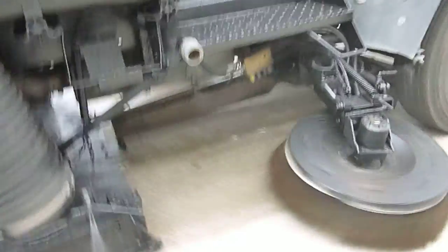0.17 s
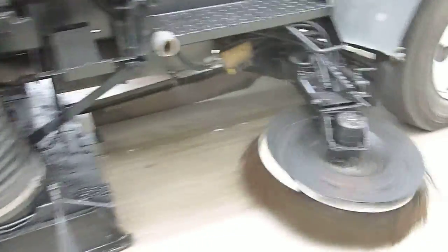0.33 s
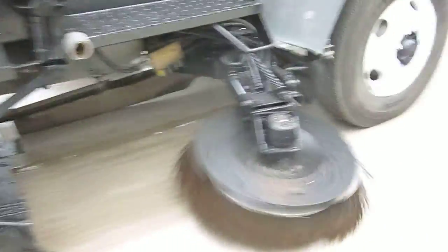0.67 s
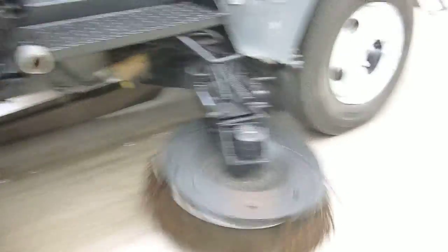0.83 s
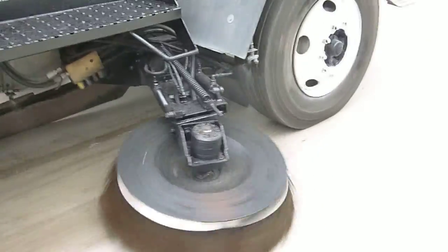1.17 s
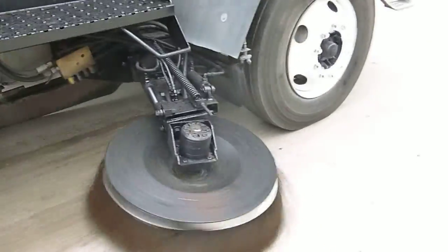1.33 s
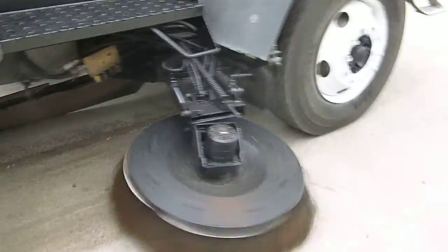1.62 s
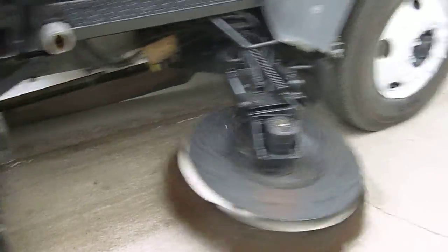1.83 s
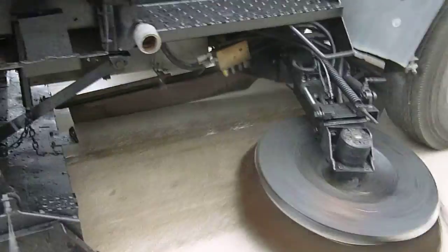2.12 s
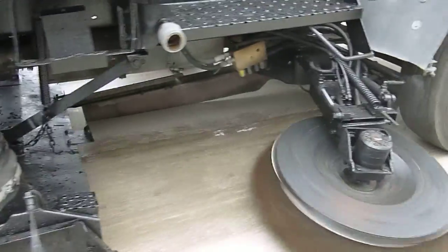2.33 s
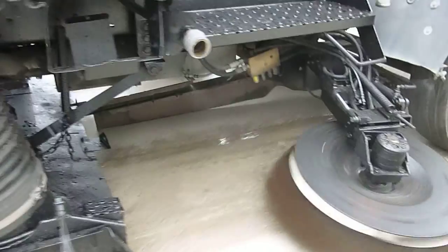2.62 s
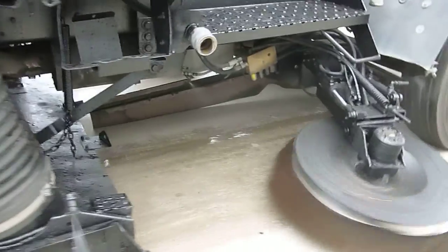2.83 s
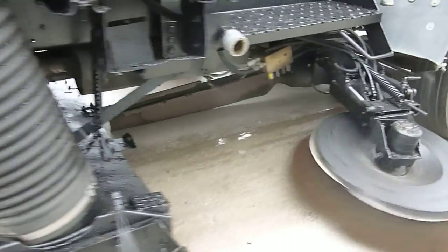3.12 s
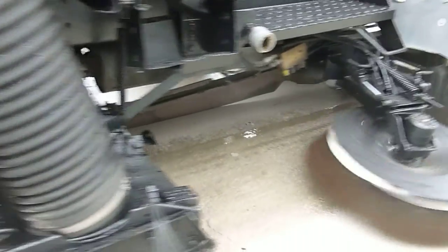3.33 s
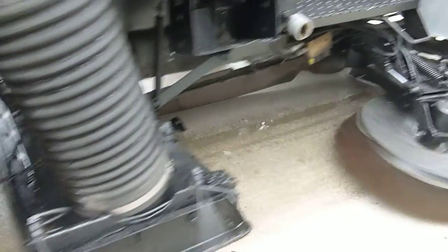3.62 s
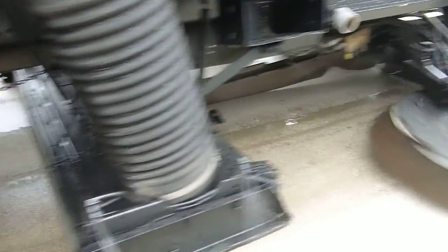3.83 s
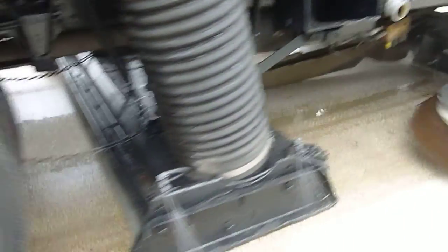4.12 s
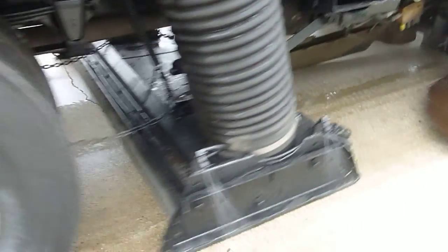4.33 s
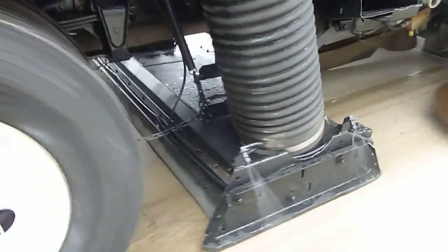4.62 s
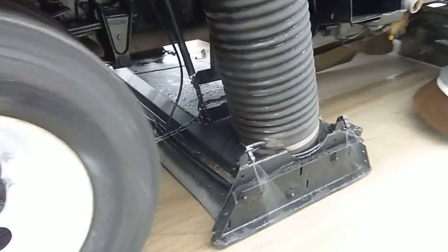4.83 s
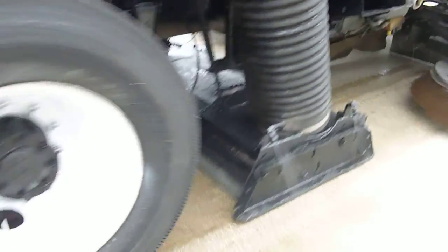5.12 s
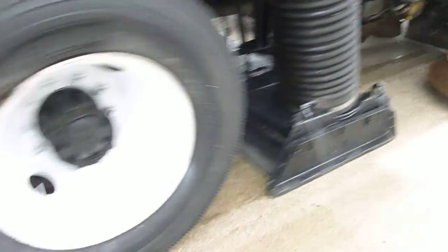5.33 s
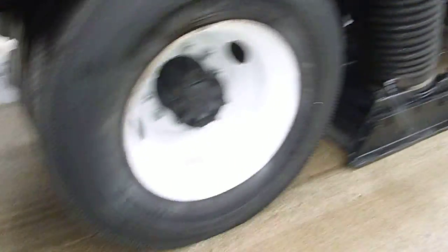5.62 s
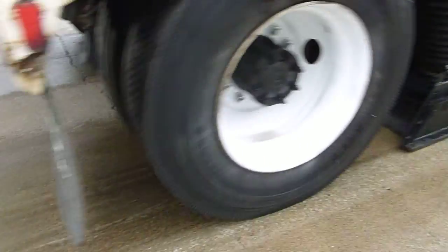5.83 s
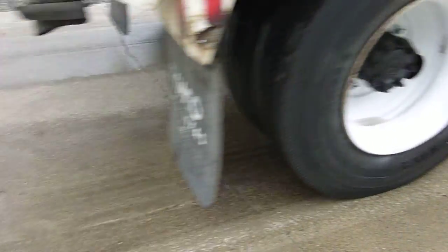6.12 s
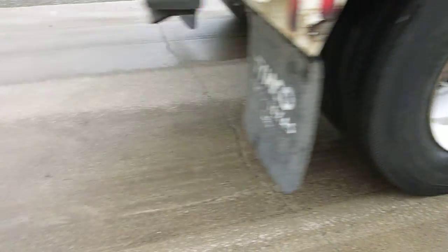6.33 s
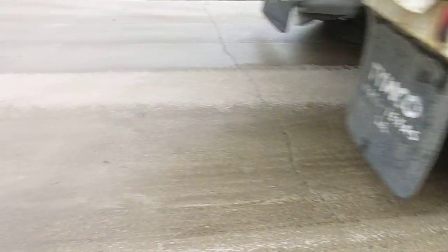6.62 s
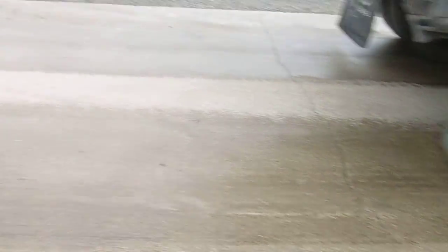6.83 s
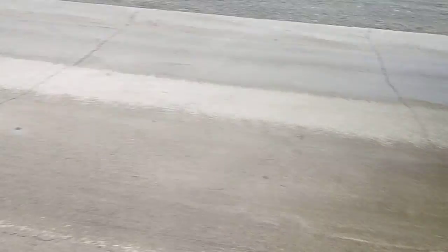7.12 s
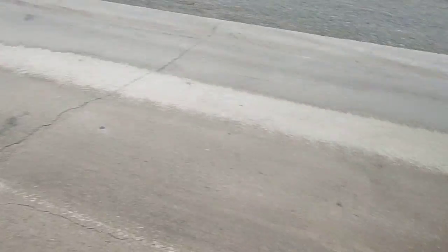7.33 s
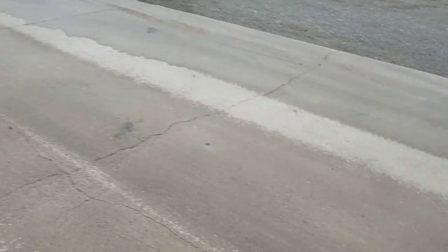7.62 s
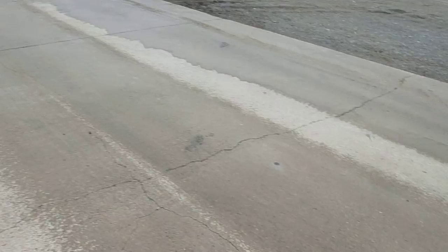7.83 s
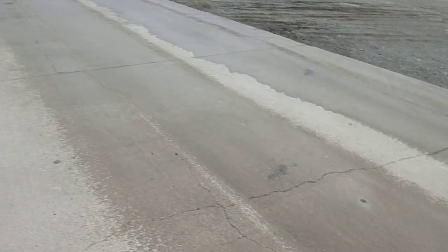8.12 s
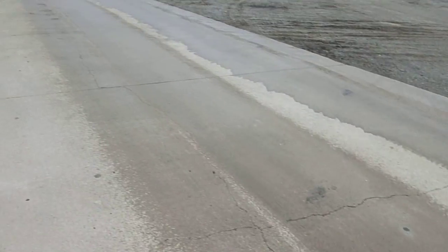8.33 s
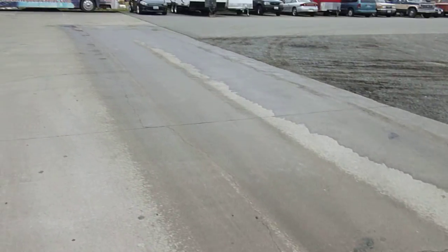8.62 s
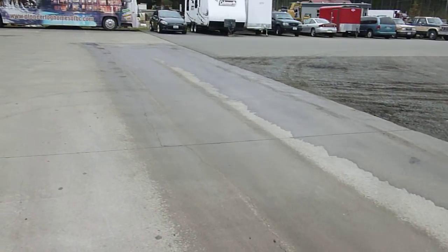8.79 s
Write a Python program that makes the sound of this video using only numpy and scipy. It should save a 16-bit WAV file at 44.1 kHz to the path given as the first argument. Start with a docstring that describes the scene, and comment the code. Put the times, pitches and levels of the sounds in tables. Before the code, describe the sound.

Steady diesel hum, wavering blower drone and broad air noise from a slowly passing sweeper truck, with a steel brush swishing on concrete.

```python
"""Street sweeper passing on a concrete yard

From a few steps away the microphone hears cab and side broom creep by, then the nozzle, then the tail.
The diesel hums and clatters; the suction fan drones on its blade tones and roars through the hopper;
the steel broom swishes once a turn and flicks grit. Each part is loudest as it draws level;
wheel and body then screen the front of the truck, and the roar from the tail takes over."""
import sys
import numpy as np
from scipy import signal
from scipy.fft import rfft, irfft
from scipy.io import wavfile
from scipy.ndimage import uniform_filter1d

SR = 44100
rng = np.random.default_rng(int(sys.argv[2]) if len(sys.argv) > 2 else 0)


def wrap_up_sound(samples):
    """Save the sound to the file named by the first command line argument, as 16-bit audio."""
    columns = np.atleast_2d(samples).T
    # keep every value between -1 and 1, then stretch to whole-number steps
    tamed = np.clip(columns, -1, 1)
    steps = np.round(tamed * 32767).astype(np.int16)
    wavfile.write(sys.argv[1], SR, steps)


N = 395136
T = np.arange(N) / SR

# Diesel hum, fan blade tone and its octave, swelling and fading at the microphone: time_s, level_db
HUM_LEVELS = [(0, -27.0), (3.4, -26.5), (6.3, -30.5), (6.6, -40), (7.15, -47.5), (7.85, -35.0),
              (8.96, -34.5)]
BLADE_LEVELS = [(0, -32), (0.45, -28.5), (2.4, -30.0), (3.4, -36.5), (4.4, -32.0), (5.1, -39.5),
                (5.85, -24), (6.1, -25.5), (7.0, -28.5), (7.2, -33.5), (7.9, -40), (8.96, -30.5)]
OCTAVE_LEVELS = [(0, -32.5), (0.75, -34.5), (1.15, -43), (1.6, -45.5), (2.4, -26.5), (3.6, -24.0),
                 (4.75, -25.5), (5.2, -40.5), (5.65, -27.0), (6.03, -50), (7.0, -25), (7.7, -35.5),
                 (8.1, -27.5), (8.96, -41)]
# Weaker engine tones: multiple_of_firing_rate, level_db
ENGINE_ORDERS = [(3 / 2, -44), (5 / 2, -46), (6 / 2, -46)]
# Noise spectra of body panels, engine block, outlet, hose, intake air and broom: frequency_hz, level_db
PANEL_SPECTRUM = [(70, -26), (110, -4), (170, -0.5), (240, 1), (300, -4.5), (420, -10.5), (800, -38.5)]
CLATTER_SPECTRUM = [(600, -19), (1100, -4), (1550, 0.5), (2000, -1.5), (2200, -3.5), (2600, -4),
                    (3200, -12), (5000, -21), (8000, -31.5)]
RUMBLE_SPECTRUM = [(20, -23.5), (35, -11.5), (55, -2), (85, 4), (110, -6), (160, -11.5), (300, -31.5)]
HOSE_SPECTRUM = [(200, -16), (400, -5), (590, 3), (660, 0), (720, -1), (830, -5.5), (1100, -16),
                 (2000, -34)]
RUSH_SPECTRUM = [(500, -12.5), (800, -4.5), (1000, -1), (1150, -1), (1350, -3), (1900, -12), (3500, -21.5),
                 (8000, -42)]
BROOM_SPECTRUM = [(1000, -17), (2200, -0.5), (3200, -0.5), (4000, -0.5), (5000, -2), (6000, -4.5),
                  (7000, -6.5), (7700, -11.5), (8300, -20), (8900, -37)]
# Resonances of engine guard, hopper, nozzle and the hollow under the tail: pitch_hz, width_hz, level_db
GUARD_MODES = [(2198, 110, -1), (1583, 170, -2)]
HOPPER_MODES = [(323.4, 33, -3.5), (359.2, 39, 0), (393.5, 35, -5)]
NOZZLE_MODES = [(454.7, 54, -3), (494.6, 57, -6.5)]
UNDERBODY_MODES = [(735, 260, 0)]
# Thin whines of the broom drive: pitch_hz, level_db
DRIVE_WHINES = [(1265, -46.5), (1324, -45.5), (2208, -55)]
# A stone flung against steel, and its bounces: start_s, level_db
STONE_BLOWS = [(5.603, -25), (5.607, -30), (5.610, -32)]
# Ring of the struck steel: pitch_hz, level_db, t60_s
STEEL_MODES = [(6035, 0, .033), (6352, -7, .025), (6848, -11, .04), (7574, -7, .03)]
# Bristles catching on the concrete: centre_s, half_width_s, level_re_hiss_db, pitch_hz
BRISTLE_CATCHES = [(.62, 0.044, -2, 4700), (1.16, 0.039, -7, 4900), (1.9, .03, -10, 3700),
                   (4.875, .02, -10, 3300), (5.262, .025, -3, 3930), (5.84, .04, -6, 3000),
                   (6.1, .09, -6.5, 3900), (7.52, .13, -5.5, 3600)]

# Parts going by the microphone: nearest_s, time_to_fall_3_db_s
CAB_PASS, BROOM_PASS, BRISTLE_TIPS_PASS = (1.3, 3.7), (2.1, 8.4), (1.2, 3.65)
HOSE_PASS, RUSH_PASS, UNDERBODY_PASS = (3.7, 5.0), (3.0, 7.5), (6.35, .33)
# Parts turning towards the microphone or away: start_s, end_s, change_db
NOZZLE_OPENS, OUTLET_OPENS, HOPPER_OPENS = (1.5, 5.4, 10), (3.5, 6.8, 8.2), (5.7, 7.5, 4.6)
BROOM_HIDES = (6.0, 6.4, -2.85)
TAIL_OPENS = (6.86, 7.6, 2.3)  # the tail clears and sound comes out from under the chassis
# Sound shadows and dips: start_s, deepest_s, end_s, depth_db
WHEEL_SHADOW, HOSE_SHADOW = (5.5, 6, 7.5, -7), (3.5, 5.5, 6.15, -1)  # rear wheel screens nozzle, hose
CORNER_SHADOW = (5, 6.9, 7, -2)  # cast by the body's corner
TREBLE_DIP = (7.62, 7.94, 8.25, -3.2)  # the treble dips briefly behind the truck

FIRING_HZ, BLADE_HZ = 120.4, 262.0  # governed rates of firings and fan blades
BROOM_TURN_HZ, BROOM_BITE_S = 5.45, .62


def undb(db):
    """Decibels to gain."""
    return 10 ** (np.asarray(db) / 20)


def unit(x):
    """Scale to rms 1."""
    return x / np.sqrt(np.mean(x ** 2))


def noise():
    """White noise."""
    return rng.standard_normal(N)


def drift(rate_hz):
    """Smooth random motion of rms 1 that changes about rate_hz times a second."""
    size = max(int(SR / rate_hz), 1)
    steps = np.repeat(rng.standard_normal(N // size + 1), size)
    return unit(uniform_filter1d(uniform_filter1d(steps, size), size)[:N])


def colour(x, spectrum):
    """Shape x by (frequency_hz, level_db) points; rms 1."""
    hz, db = np.transpose(spectrum)
    bins_hz = np.maximum(np.fft.rfftfreq(N, 1 / SR), 1)
    shape_db = np.interp(np.log(bins_hz), np.log(hz), db, left=-90, right=-90)
    return unit(irfft(rfft(x) * undb(shape_db), N))


def resonate(modes):
    """Noise rings each (pitch_hz, width_hz, level_db) resonance; rms 1."""
    ringing = 0
    for hz, width, db in modes:
        b, a = signal.iirpeak(hz, hz / width, SR)
        ringing += undb(db) * unit(signal.lfilter(b, a, signal.lfilter(b, a, noise())))
    return unit(ringing)


def passing(nearest_s, passing_s):
    """Level in dB of a part going by in a straight line, 0 when nearest the microphone."""
    return -20 * np.log10(np.hypot(1, (T - nearest_s) / passing_s))


def ramp(start_s, end_s, change_db):
    """Level in dB that moves evenly to a new value and stays there."""
    return change_db * np.clip((T - start_s) / (end_s - start_s), 0, 1)


def dip(start_s, deepest_s, end_s, depth_db):
    """Level in dB that sinks and comes back."""
    return ramp(start_s, deepest_s, depth_db) - ramp(deepest_s, end_s, depth_db)


def swell(levels):
    """Gain through (time_s, level_db) points: broad crests and narrow nulls, as in a standing wave."""
    time_s, db = np.transpose(levels)
    return np.interp(T, time_s, undb(db))


def ground_echo(x, echo_db=-18, lag_s=.004, sway=.12):
    """Concrete and chassis return the treble a moment later; the lag drifts as the truck moves."""
    treble = signal.sosfilt(signal.butter(2, 900, "high", fs=SR, output="sos"), x)
    delay_s = lag_s * (1 + sway * drift(1))
    return x + undb(echo_db) * np.interp(T - delay_s, T, treble)


def broom_drive(nearest_s=3.2, passing_s=0.79, wobble=.003):
    """The hydraulic drive whines faintly as it goes by."""
    whine = 0
    for hz, db in DRIVE_WHINES:
        phase = 2 * np.pi * np.cumsum(hz * (1 + wobble * drift(40))) / SR
        whine += np.sin(phase) * undb(db + 2 * drift(5.5))
    return np.sqrt(2) * whine * undb(passing(nearest_s, passing_s))


def flung_stone(crack_db=-1.5, crack_s=.0015, ring_db=-6.5):
    """A stone strikes steel and bounces; each blow gives a short crack and a bright ring."""
    t = T[:SR // 10]
    ring = sum(undb(db - 60 * t / t60) * np.sin(2 * np.pi * hz * t) for hz, db, t60 in STEEL_MODES)
    blows = np.zeros(N)
    for start_s, db in STONE_BLOWS:
        blows[int(start_s * SR)] += undb(db)
    bright_noise = colour(noise(), [(3000, -16), (5000, -10), (6000, 0), (8000, -1), (9000, -16)])
    crack = signal.fftconvolve(blows, np.exp(-t / crack_s))[:N] * bright_noise
    return undb(ring_db) * signal.fftconvolve(blows, ring)[:N] + undb(crack_db) * crack


def diesel(hum_db=-0.2, clatter_db=-35.8, guard_db=-46.5, panel_db=-30, knock=0.29,
           flutter_db=0.5, surge_db=0.7, wobble=0.00203):
    """Firings make a smooth hum; the block knocks on every second one, clearly only beside the cab."""
    phase = 2 * np.pi * np.cumsum(FIRING_HZ * (1 + wobble * drift(8))) / SR
    hum = np.sin(phase) * swell(HUM_LEVELS) * undb(hum_db + flutter_db * drift(14))
    for multiple, db in ENGINE_ORDERS:
        hum += np.sin(multiple * phase) * undb(db + 2 * drift(3.7))
    beside_cab = np.interp(T, [3.4, 4.6], [1, .2])
    beat = 1 + knock * beside_cab * np.cos(phase / 2) + .14 * np.cos(phase)
    clatter = colour(noise() * beat, CLATTER_SPECTRUM) * undb(clatter_db)
    clatter += resonate(GUARD_MODES) * beat * undb(guard_db)
    path_db = passing(*CAB_PASS) + .6 * dip(*CORNER_SHADOW) + ramp(*TAIL_OPENS) + dip(*TREBLE_DIP)
    rear_db = np.interp(T, [5, 7.5], [-.4, .8])  # the panels sound fuller from behind
    panels = colour(noise(), PANEL_SPECTRUM) * undb(panel_db + rear_db + 0.49 * drift(5))
    return np.sqrt(2) * hum + clatter * undb(path_db + surge_db * drift(12)) + panels


def side_broom(hiss_db=-35.5, tips_db=-34.0, swish_db=0.66, flicker_db=0.43, patchy_db=0.77,
               slips_per_s=600, grit_db=-11.5, spread_db=3.5):
    """Steel bristles scrape the concrete in tiny slips and bite harder once a turn."""
    slips = (rng.random(N) < slips_per_s / SR) * noise()
    slips *= undb(spread_db * np.minimum(rng.exponential(size=N), 5))
    scrape = colour(noise() + undb(grit_db) * unit(slips), BROOM_SPECTRUM)
    # The top treble of the tips fades first as the broom moves off.
    tips = signal.sosfiltfilt(signal.butter(4, 5200, "high", fs=SR, output="sos"), scrape)
    hiss = (scrape - tips) * undb(patchy_db * drift(16))
    for centre_s, half_width_s, db, hz in BRISTLE_CATCHES:
        hiss += resonate([(hz, hz / 3, 0)]) * undb(db) * np.exp(-((T - centre_s) / half_width_s) ** 2)
    hiss *= undb(hiss_db + passing(*BROOM_PASS) + ramp(*BROOM_HIDES))
    tips_path_db = passing(*BRISTLE_TIPS_PASS) + .3 * ramp(*BROOM_HIDES) + .8 * ramp(*TAIL_OPENS)
    tips *= undb(tips_db + tips_path_db + patchy_db * drift(24))
    bite_db = swish_db * np.cos(2 * np.pi * BROOM_TURN_HZ * (T - BROOM_BITE_S))
    return (hiss + tips) * undb(dip(*TREBLE_DIP) + bite_db + flicker_db * drift(10))


def suction_air(rumble_db=-43.9, hopper_db=-33.2, nozzle_db=-40, hose_db=-31.5, rush_db=-35.8,
                underbody_db=-37.5, gust_db=0.8, churn_db=0.8):
    """Air rushes into the nozzle, rings hose, hopper and underbody and rumbles out at the tail."""
    gusts = gust_db * drift(12)
    rumble = colour(noise(), RUMBLE_SPECTRUM) * undb(rumble_db + ramp(*OUTLET_OPENS))
    hopper = resonate(HOPPER_MODES) * undb(hopper_db + ramp(*HOPPER_OPENS) + churn_db * drift(8.9))
    nozzle_path_db = ramp(*NOZZLE_OPENS) + dip(*WHEEL_SHADOW)
    nozzle = resonate(NOZZLE_MODES) * undb(nozzle_db + nozzle_path_db + churn_db * drift(8))
    hose_path_db = passing(*HOSE_PASS) + dip(*HOSE_SHADOW)
    hose = colour(noise(), HOSE_SPECTRUM) * undb(hose_db + hose_path_db + gusts)
    howl = resonate(UNDERBODY_MODES) * undb(underbody_db + passing(*UNDERBODY_PASS) + gusts)
    rush_path_db = passing(*RUSH_PASS) + dip(*CORNER_SHADOW) + ramp(*TAIL_OPENS) + dip(*TREBLE_DIP)
    rush = colour(noise(), RUSH_SPECTRUM) * undb(rush_db + rush_path_db + gusts)
    return rumble + hopper + nozzle + hose + howl + rush


def suction_fan(blade_db=0.1, octave_db=1.7, third_db=-19.3, flutter_db=1.06, wobble=0.00204):
    """Blades pass the housing's lip; uneven inflow shakes each tone a little."""
    doppler = np.interp(T, [3, 6, 8], [1.001, 1, .998])  # the pitch sinks as the truck draws away
    phase = 2 * np.pi * np.cumsum(BLADE_HZ * doppler * (1 + wobble * drift(20))) / SR
    blade, octave = swell(BLADE_LEVELS), swell(OCTAVE_LEVELS)
    gains = [blade * undb(blade_db), octave * undb(octave_db), octave * undb(third_db)]
    tones = [np.sin(k * phase) * gain * undb(flutter_db * drift(22)) for k, gain in enumerate(gains, 1)]
    return np.sqrt(2) * sum(tones)


def scene():
    """The whole truck over concrete, in mono from a few steps away."""
    truck = diesel() + suction_fan() + suction_air() + side_broom() + broom_drive() + flung_stone()
    return ground_echo(truck)[None]


def record(dry, ceiling=0.42, cutoff_hz=8800):
    """A small camera's microphone rounds the highest peaks and cuts the treble."""
    rounded = dry / (1 + (dry / ceiling) ** 4) ** (1 / 4)
    return signal.sosfilt(signal.ellip(8, .2, 80, cutoff_hz, fs=SR, output="sos"), rounded)


dry = scene()
out = record(dry)
wrap_up_sound(out)
```